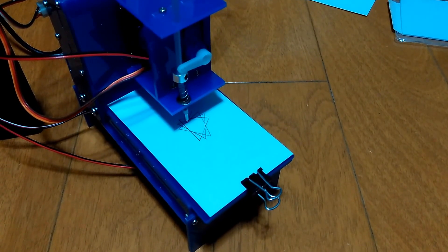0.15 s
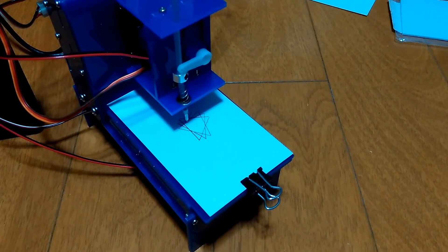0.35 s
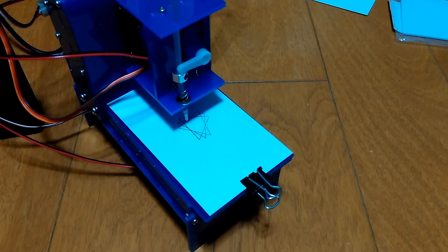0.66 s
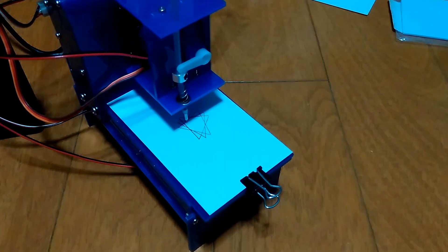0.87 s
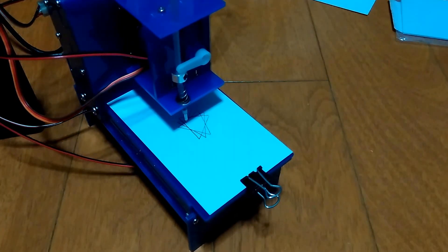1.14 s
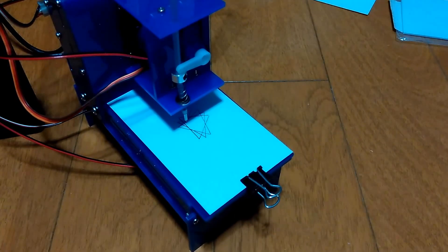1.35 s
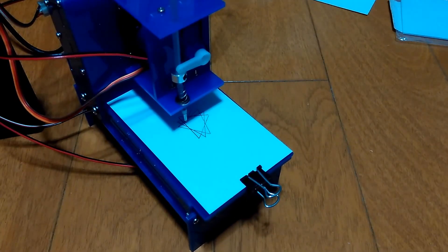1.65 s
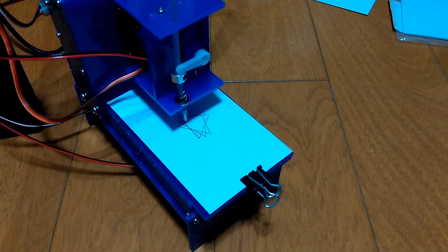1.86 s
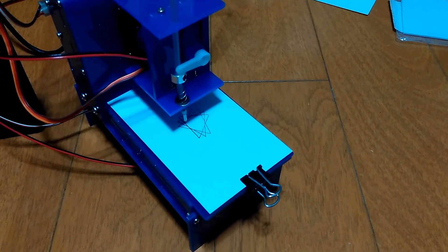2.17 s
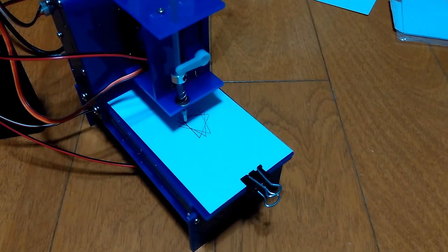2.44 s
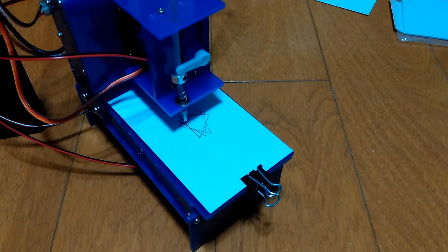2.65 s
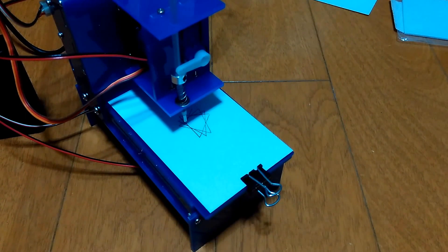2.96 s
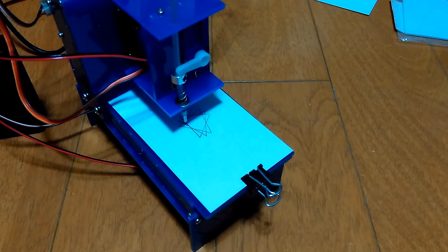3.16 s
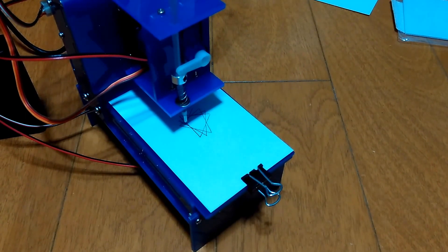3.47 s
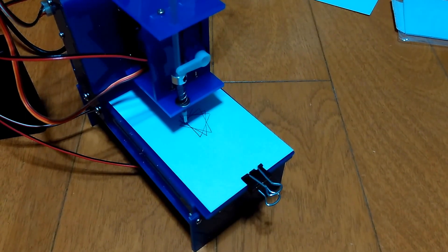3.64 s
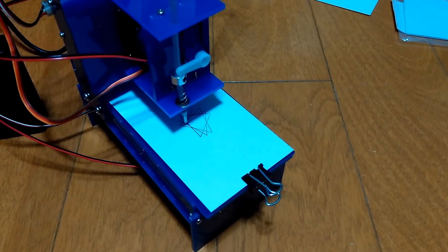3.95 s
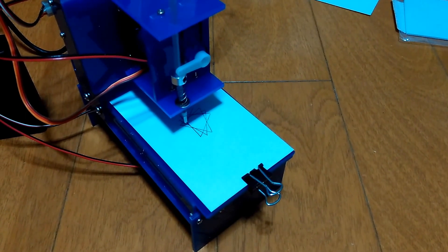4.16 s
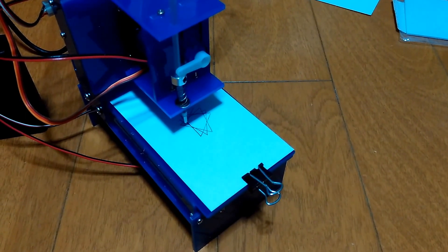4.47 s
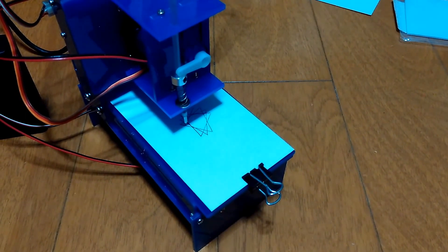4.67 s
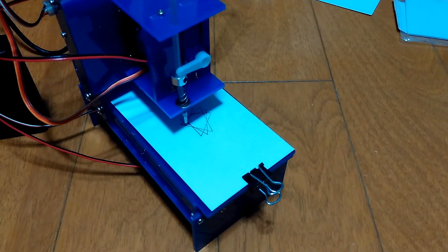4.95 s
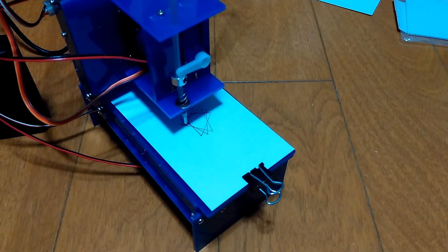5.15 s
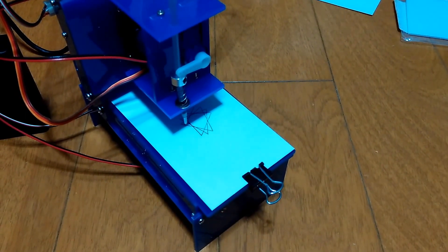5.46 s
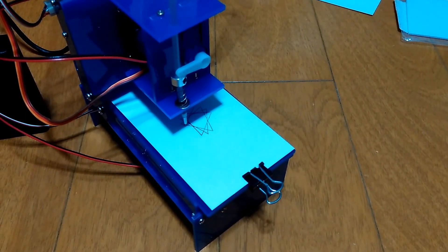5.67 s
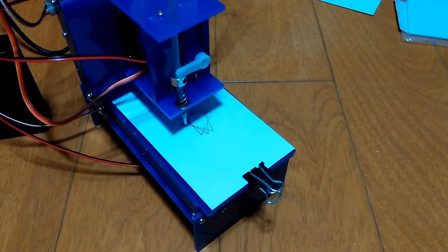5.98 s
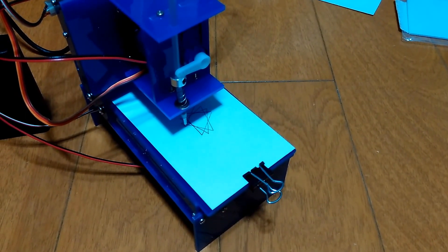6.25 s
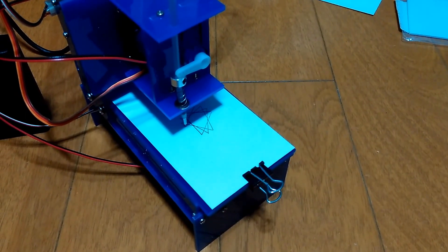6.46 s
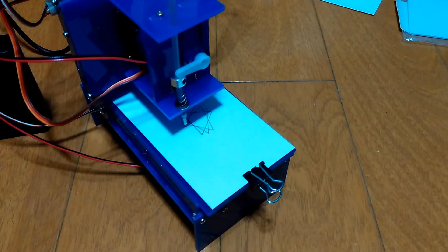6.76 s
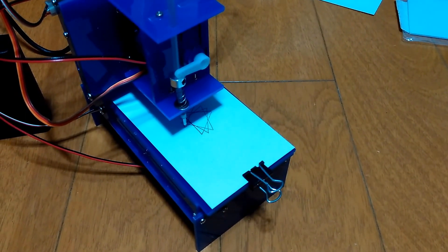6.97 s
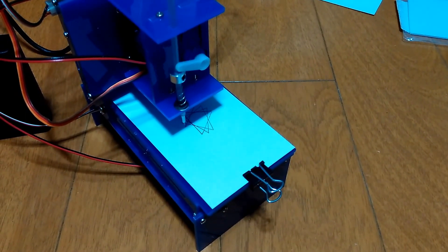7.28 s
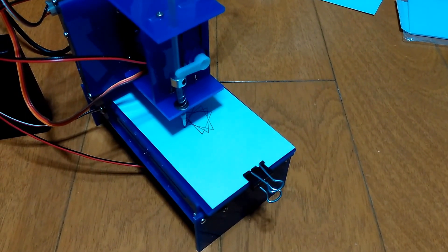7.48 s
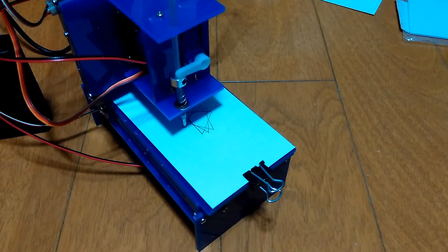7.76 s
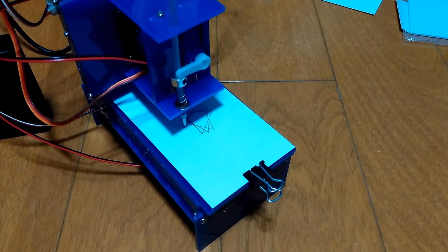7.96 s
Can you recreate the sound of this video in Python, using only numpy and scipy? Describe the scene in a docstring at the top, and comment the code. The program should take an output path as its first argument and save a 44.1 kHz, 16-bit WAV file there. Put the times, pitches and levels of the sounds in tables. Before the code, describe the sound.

A small plastic pen plotter buzzes with a fast, thin servo chatter, broken by irregular sharp clicks and rattles, then two short gear whirs near the end.

```python
"""A small plastic pen plotter works on a wooden floor, heard by a two-port microphone close by.
Its pen servo twitches fifty times a second and swings twice: enveloped noise and clicks excite resonances.
Slide jerks add bursts of rattle, the carriage scuffs, and blows on the floor ring its damped modes.
Coloured noise gives the room's rumble; two faint hums glide and waver far off, mainly at the left port.
The pressure at the right port jumps twice, each time as a pop."""
import sys
import numpy as np
from scipy import signal
from scipy.fft import rfft, irfft, next_fast_len
from scipy.io import wavfile

SR = 44100
rng = np.random.default_rng(int(sys.argv[2]) if len(sys.argv) > 2 else 0)


def transcribe(u):
    """Save the signal u as a 16-bit wav file named by the first command-line argument.

    u: samples, shape (n,) or (channels, n), limited to [-1, 1]; the rate is SR.
    q: integer samples, one column per channel.
    """
    v = np.clip(np.atleast_2d(u).T, -1, 1)
    q = np.round(v * 32767).astype(np.int16)
    wavfile.write(sys.argv[1], SR, q)


N = 358091
FFT_SIZE = next_fast_len(N, real=True)
LEFT_LAG, ROOM_LAG = 22, 7   # samples: left port later for the machine; right port earlier for the room

# Resonances of the servo case.
# Each row: frequency in Hz, width in Hz, relative level idling in dB, relative level under load in dB.
CASE_MODES = [(2736, 190, -9, -19), (3117, 160, -8.5, -8), (3424, 63, -8.5, -8), (3553, 81, -13, -10.5),
              (3840, 600, -7, -10), (4455, 400, -6.5, -23), (4720, 327, 0.5, 0), (5190, 155, -6, -0.5),
              (5790, 570, -12, -5), (6620, 120, -14, -9)]
# Each case resonance radiates from its own face.
# Each entry: delay of the left port in samples.
CASE_LAGS = [20, 21, 20, 24, 17, 22, 22, 22, 23, 22]
# Resonances of the gear train.
# Each row: frequency in Hz, width in Hz, relative level under load in dB, relative level when jolted in dB.
GEAR_MODES = [(7920, 170, -6, -10), (9260, 220, 4, -13), (9530, 260, -13, -12.5), (10060, 210, -1, -5),
              (10710, 250, -1, 3.5), (13060, 370, -5, -4), (14100, 240, -0.5, -15.5)]
GEARS_RIGHT_DB = -13   # gear ringing at the right port, relative to the left


def from_db(db):
    """Logarithmic level: decibels to amplitude gain."""
    return 10 ** (np.asarray(db) / 20)


def rms_one(x):
    """Power normalisation: scale to unit rms."""
    return x / np.sqrt(np.mean(x ** 2) + 1e-20)


def in_time(rows):
    """Linear interpolation: the columns of a curve table, one value a sample."""
    s, *columns = np.transpose(rows)
    return [np.interp(np.arange(N) / SR, s, c) for c in columns]


def over_hz(table):
    """Interpolation over log frequency: the columns of a spectrum table on the transform grid."""
    hz, *columns = np.transpose(table)
    grid = np.log(np.maximum(np.arange(FFT_SIZE // 2 + 1) * SR / FFT_SIZE, 1))
    return [np.interp(grid, np.log(hz), c) for c in columns]


def drift(rate_hz):
    """Low-passed noise: a slow random modulation of spread about 1, with two poles at the rate."""
    step = 40   # samples between values of the slow noise
    r = np.exp(-2 * np.pi * rate_hz * step / SR)
    noise = rng.standard_normal(N // step + 2002)
    slow = signal.lfilter([1], [1, -2 * r, r * r], noise)[2000:]   # the filter settles first
    return np.interp(np.arange(N) / step, np.arange(len(slow)), rms_one(slow))


def strikes(seconds, gains):
    """Impulse excitation: a train of single-sample clicks."""
    clicks = np.zeros(N)
    at = np.clip((np.asarray(seconds) * SR).astype(int), 0, N - 1)
    np.add.at(clicks, at, gains)
    return clicks


def swell(clicks, rise_s, fall_s):
    """Exponential build-up and decay: each click becomes a smooth envelope, lower the slower its rise."""
    a, b = np.exp(-1 / (rise_s * SR)), np.exp(-1 / (fall_s * SR))
    return signal.lfilter([1 - a], np.convolve([1, -a], [1, -b]), clicks + 1e-18)


def at_ports(x):
    """Arrival-time difference: the machine reaches the right port first."""
    return np.array([np.roll(x, LEFT_LAG), x])


def struck(modes, seconds, level_db, spread_db, tilt_db=0):
    """Modal synthesis: each blow excites every damped mode with a strength of its own."""
    out = np.zeros(N)
    luck = rng.standard_normal((len(seconds), len(modes)))
    for k, (hz, mode_db, t60) in enumerate(modes):
        r, w = from_db(-60 / (t60 * SR)), 2 * np.pi * hz / SR
        octaves = np.log2(hz / modes[0][0])
        blow_db = level_db + mode_db + tilt_db * octaves + spread_db * luck[:, k]
        # rise and fall times are fractions of the mode's period
        force = swell(strikes(seconds, from_db(blow_db)), 0.071 / hz, 0.23 / hz) / (.3 * SR / hz)
        out += signal.lfilter([0, np.sin(w)], [1, -2 * r * np.cos(w), r * r], force)
    return out


def body(resonances, envelope, flicker_db, flicker_hz, taps=0, lags=None, sway_s=0):
    """Forced resonance: noise under one envelope (or one each) and clean taps shake a plastic part."""
    sway_hz = 25   # how fast the resonances waver in pitch as the parts flex
    out = np.zeros((2, N))
    shake = np.atleast_2d(rng.standard_normal(N) * envelope + taps)
    for k, (hz, width_hz, level_db) in enumerate(resonances):
        r = np.exp(-np.pi * width_hz / SR)
        poles = [1, -2 * r * np.cos(2 * np.pi * hz / SR), r * r]
        sos = [[(1 - r * r) / 2, 0, (r * r - 1) / 2, *poles]] * 2
        share = from_db(level_db + flicker_db * np.clip(drift(flicker_hz), -3, 2))
        rung = signal.sosfilt(sos, shake[k % len(shake)] * share)
        rung *= (-1) ** k * np.sqrt(SR / width_hz)   # neighbours have opposite signs
        if sway_s:   # a varying delay bends the pitch
            rung = np.interp(np.arange(N) + sway_s * SR * drift(sway_hz), np.arange(N), rung)
        out += [np.roll(rung, lags[k] if lags else LEFT_LAG), rung]
    return out


def rattle(envelope, grain_db, grit_db):
    """Partly coherent noise: loose gear teeth give uneven grains in the colour of the case."""
    # Gear rattle at the ports.
    # Each row: frequency in Hz, relative left level in dB, relative right level in dB, likeness 0-1.
    rattle_colour = [(1230, -34, -38, 1), (2030, -25, -22, 0.9), (2560, -34, -39, 0.8),
                     (3120, -51, -23, 0.8), (3700, -39, -17, 0.7), (4300, -20, -11, .7),
                     (4730, -25, -9, 0.3), (6930, -10, -12, 0), (8760, 0, -4.5, 0),
                     (10940, 2.5, -12.5, 0.35), (11730, -5, -12, 0.3), (13400, -5.5, -34, 0.8),
                     (14200, -6.5, -19, 0.8)]
    grit = from_db(grit_db * np.minimum(rng.exponential(1, (2, N)), 3))
    own = rng.standard_normal((2, N)) * grit
    grain = from_db(grain_db * np.clip(drift(300), -3, 2))
    grains = np.array([np.roll(own[1], LEFT_LAG), own[0], own[1]]) * grain
    shared, apart, right = rfft(rms_one(grains) * envelope[[0, 0, 1]], FFT_SIZE)
    left_db, right_db, alike = over_hz(rattle_colour)
    alike = np.clip(alike, 0, 1)
    colour = from_db([left_db, right_db])
    colour /= np.sqrt(np.mean(colour[0] ** 2))
    left = alike * shared + np.sqrt(1 - alike ** 2) * apart
    return irfft([left, right] * colour, FFT_SIZE)[:, :N]


def swing_level():
    """Piecewise decibel envelope of the gears: run-up, sagging run, quick stop and after-rattle."""
    # Servo swings.
    # Each row: start in seconds, run-up in seconds, stop in seconds, gear level after the run-up in dB.
    swing_rows = [(7.270, 0.0076, 7.34, -31), (7.47, 0.017, 7.555, -26.5)]
    rise_db, sag_db_per_s = 22, 61
    stop_drop_db, stop_fall_s, after_db_per_s = 14, 0.026, 213
    t, out = np.arange(N) / SR, np.full(N, -120.)
    for start, rise_s, stop, level_db in swing_rows:
        top = start + rise_s
        end_db = level_db - sag_db_per_s * (stop - top)
        after, after_db = stop + stop_fall_s, end_db - stop_drop_db
        s = [start, top, stop, after, after + .5]
        db = [level_db - rise_db, level_db, end_db, after_db, after_db - .5 * after_db_per_s]
        out = np.maximum(out, np.interp(t, s, db, left=-120))
    return out


def servo_idle():
    """Periodic impulsive excitation: each control pulse kicks the motor, gears rattle, case knocks."""
    # The idling machine, before chance variation and the dip below.
    # Each row: time in seconds, nominal levels of twitch knock, twitch rattle and steady whirr in dB.
    idle_curve = [(0.0, -56, -47, -57), (0.7, -57, -46.5, -59), (1.45, -49, -44.5, -57.5),
                  (2.1, -50, -45.5, -58), (2.5, -52, -49.5, -64), (3.1, -51.5, -49.5, -64.5),
                  (3.75, -53, -47.5, -61), (4.3, -53, -49.5, -64), (5.0, -52.5, -49.5, -63),
                  (5.8, -52.5, -50, -62.5), (6.45, -50, -47.5, -60.5), (6.85, -50.5, -51, -62),
                  (7.25, -50.5, -53.5, -61.5), (7.62, -50, -47, -64), (8.12, -45.5, -45.5, -54.5)]
    twitch_hz, first_twitch_s = 50, .0105
    # twitches and whirr drop in level between the two swings
    dip_from_s, dip_until_s, dip_db, dip_fade_s = 7.40, 7.47, 30, 0.016
    loaded_knock_db = -10.5   # least knock level, relative to the swing's gear level
    hiss_db = -23   # steady shaking of the case between twitches, relative to the knock
    drop_db, = in_time([(dip_from_s, 0), (dip_from_s + dip_fade_s, -dip_db),
                        (dip_until_s, -dip_db), (dip_until_s + .01, 0)])
    knock_db, rattle_db, whirr_db = np.array(in_time(idle_curve)) + drop_db
    knock_db = np.maximum(knock_db, swing_level() + loaded_knock_db)

    count = int(N / SR * twitch_hz)
    luck = rng.standard_normal((count, 3))
    s = first_twitch_s + np.arange(count) / twitch_hz + 0.00028 * luck[:, 0]
    at = (s * SR).astype(int)
    taps = strikes(s - .0018, from_db(knock_db[at] + 1.7 * luck[:, 1]))
    knocks = swell(taps, 0.0012, 0.0007)
    whirr = from_db(whirr_db + 2.1 * drift(22.0))

    # a faint run-up, then the jolt
    kicks = strikes(s - .004, from_db(rattle_db[at] + 1.8 * luck[:, 1] + 0.81 * luck[:, 2]))
    run_up = from_db(-4.5) * swell(np.roll(kicks, -40), 0.002, 0.0071)
    jolt = from_db(2.0) * swell(np.roll(kicks, 150), 0.00068, 0.0026)
    gears = np.hypot(run_up, jolt)

    idling = [(hz, width_hz, idle_db) for hz, width_hz, idle_db, _ in CASE_MODES]
    shaking = np.hypot(knocks, from_db(knock_db + hiss_db + 3.6 * drift(14)))
    case = body(idling, shaking, flicker_db=2.2, flicker_hz=24.4,
                taps=from_db(10.0) * np.roll(taps, 100), lags=CASE_LAGS, sway_s=.0001)
    loose = np.hypot(at_ports(gears), at_ports(whirr) * from_db([[0], [-2.5]]))
    return case + rattle(loose, grain_db=2.5, grit_db=3.0)


def slide_jerks():
    """Impact and rattle: a clean hit rings gears and frame, loose parts decay; some have a lead-in."""
    # Slide jerks.
    # Each row: time in seconds, reference level in dB, frame knock and tail relative to it in dB.
    jerk_rows = [(0.185, -37.5, -26.5, -27), (0.2495, -38, -27, -16), (0.9592, -42, -41, -8),
                 (1.01, -39, -41, -16), (1.3293, -35.5, -26, -10.5), (1.41, -52, -34, -22),
                 (1.437, -35, -30, -8.5), (1.7122, -33, -20, -18), (1.844, -37.5, -22.5, -23),
                 (2.0972, -32.5, -17, -9), (2.582, -43, -19, -2.5), (2.6927, -35, -33, -11),
                 (2.806, -34, -17, -6), (2.9114, -38, -25, -11), (2.9155, -24, -20.5, -14.5),
                 (3.237, -42, -22, -4), (3.299, -41.5, -27, -2.5), (3.5571, -30.5, -30, -14),
                 (3.9461, -29, -19.5, -8.5), (4.1574, -35.5, -28, -6), (4.4284, -33.5, -27, -10),
                 (4.4404, -48, -34, -16), (4.5421, -29.5, -18, -10), (5.2496, -35.5, -45, -21),
                 (5.2697, -37, -31, -17), (5.415, -41, -16.5, -1.5), (5.63, -51, -18, 0),
                 (5.915, -43, -27, -11), (6.285, -44.5, -38, 0.5), (6.4979, -29, -36, -13),
                 (6.512, -34, -26, -15), (6.8818, -26, -21, -11), (7.671, -41, -47, -24),
                 (7.753, -38, -49, -22), (7.852, -44, -32, -11), (7.863, -45, -40, -4),
                 (7.8656, -38, -19, -4), (7.878, -37, -28, -11.5), (7.911, -48, -28, -22),
                 (7.951, -40, -23, -14), (8.008, -40, -24, -16)]
    # Slack that rattles out just before some jerks.
    # Each row: time in seconds, nominal level in dB.
    slack_rows = [(0.181, -44.5), (0.2445, -43), (1.3265, -46), (1.7098, -40.5), (2.801, -37), (3.943, -36),
                  (4.539, -37.5)]
    # Resonances of the frame.
    # Each row: frequency in Hz, width in Hz, relative level in dB.
    frame_modes = [(1155, 670, -1), (1474, 170, -4.5), (1750, 310, -10.5), (2620, 570, -9.5),
                   (3250, 170, -9.5)]
    burst_db, ring_db = -6.5, 7.5   # loose rattle and gear ringing hit, beside the reference level
    pan_db = 3   # rattle, left minus right
    s, peak_db, knock_db, tail_db = np.transpose(jerk_rows)
    lead_s, lead_db = np.transpose(slack_rows)
    lead = swell(strikes(lead_s, from_db(lead_db)), 0.00037, 0.0037)
    burst = swell(strikes(s, from_db(peak_db + burst_db)), 0.00031, 0.0025)
    tail = swell(strikes(s, from_db(peak_db + tail_db - 2.5)), 0.0022, 0.02)

    blows = strikes(s, from_db(peak_db + knock_db))
    shaking = 0.23 * swell(blows, 0.00083, 0.0043) + 0.17 * swell(blows, 0.0015, 0.022)
    knock = body(frame_modes, shaking, flicker_db=3.0, flicker_hz=21.0, taps=from_db(15.5) * blows)
    jolted = [(hz, width_hz, jolt_db) for hz, width_hz, _, jolt_db in GEAR_MODES]
    hits = strikes(s, from_db(peak_db + ring_db))
    ring = body(jolted, 0, flicker_db=2.0, flicker_hz=30.0, taps=hits)

    sides = from_db([[pan_db / 2], [-pan_db / 2]])
    envelope = np.sqrt(lead ** 2 + burst ** 2 + tail ** 2)
    shaken = rattle(envelope * sides, grain_db=3.5, grit_db=0.5)
    return shaken + knock * from_db([[4], [-4]]) + ring * from_db([[0], [GEARS_RIGHT_DB]])


def servo_swings():
    """Random tooth impacts under load: dense rattle and hard catches ring the case and the gears."""
    # Teeth catching hard during and around the swings.
    # Each row: time in seconds, nominal level in dB.
    catch_rows = [(7.2717, -27), (7.279, -14.5), (7.2844, -17), (7.2944, -24), (7.3044, -24), (7.3114, -26),
                  (7.3297, -21.5), (7.344, -27), (7.389, -43), (7.4795, -22), (7.4907, -16), (7.496, -17),
                  (7.503, -17), (7.5103, -15.5), (7.5154, -11.5), (7.5204, -15), (7.5257, -18),
                  (7.5325, -20), (7.5424, -22), (7.554, -23), (7.5674, -38)]
    teeth_per_s, teeth_db, teeth_spread_db = 410, 3, -1   # mean rate and strength of tooth contacts
    s, catch_db = np.transpose(catch_rows)
    catches = swell(strikes(s - .0007, from_db(catch_db)), 0.00069, 0.0014)
    envelope = np.hypot(from_db(swing_level()), catches)
    contacts = rng.random(N) < teeth_per_s / SR
    teeth = contacts * from_db(teeth_db + teeth_spread_db * rng.standard_normal(N))

    sway_s = .00004   # spread of the wavering, as delay
    loaded = [(hz, width_hz, load_db) for hz, width_hz, _, load_db in CASE_MODES]
    case = body(loaded, from_db(-23) * envelope, flicker_db=4.0, flicker_hz=39.7,
                taps=teeth * envelope, lags=CASE_LAGS, sway_s=sway_s)
    meshing = [(hz, width_hz, load_db) for hz, width_hz, load_db, _ in GEAR_MODES]
    hits = from_db(-4.5) * teeth * envelope + strikes(s, from_db(catch_db + 2.5))
    gears = body(meshing, from_db(-41) * envelope, flicker_db=2.5, flicker_hz=29.7,
                 taps=hits, sway_s=sway_s)
    loose = rattle(at_ports(envelope) * from_db([[0.1], [-0.4]]), grain_db=2.1, grit_db=3.5)
    return loose + case + gears * from_db([[0], [GEARS_RIGHT_DB]])


def scuffs():
    """Friction noise: something on the carriage rubs for a few milliseconds and excites resonances."""
    # Short dry scuffs.
    # Each row: time in seconds, nominal excitation of the low, middle and high resonance in dB.
    scuff_rows = [(2.589, -56, -53, -66), (2.803, -59, -70, -72), (3.298, -72, -61, -51),
                  (5.039, -72, -72, -46), (5.416, -59, -56, -56), (5.639, -54, -68, -51),
                  (5.91, -53, -68, -46.5), (6.51, -66, -64, -45), (7.871, -53, -53.5, -50)]
    # Resonances of the rubbing part.
    # Each row: frequency in Hz, width in Hz, relative level in dB.
    scuff_modes = [(1440, 160, 0), (2110, 1350, 0), (2870, 520, 0)]
    rise_s, fall_s = 0.0055, 0.0056
    s, *levels_db = np.transpose(scuff_rows)
    rub = np.array([swell(strikes(s, from_db(db)), rise_s, fall_s) for db in levels_db])
    return body(scuff_modes, rub, flicker_db=-1.0, flicker_hz=27) * from_db([[1.5], [-1.5]])


def floor_thumps():
    """Modal excitation: soft blows ring the boards, sharper ones the higher modes."""
    # Thumps in the floor.
    # Each row: time in seconds, nominal level in dB, sharpness in dB per octave.
    thump_rows = [(0.201, -53.5, 0.5), (1.134, -55, -4), (1.451, -55, -1), (2.443, -55, -8),
                  (3.963, -48.5, -0.5), (4.56, -48, 1.5), (4.936, -44.5, -9), (5.105, -57, 2),
                  (5.198, -59, 5), (5.915, -53, 7), (6.299, -55, 4.5), (6.523, -49.5, 2),
                  (6.894, -46, -1.5), (7.13, -53, -2), (7.291, -43, 2), (7.885, -53, 5)]
    # Modes of the floor boards.
    # Each row: frequency in Hz, relative level in dB, decay time by 60 dB in seconds.
    board_modes = [(73.4, 14, 0.27), (144.5, 8, 0.13), (221, 12, 0.059), (322, 4, 0.043)]
    s, level_db, sharp_db = np.transpose(thump_rows)
    thumps = struck(board_modes, s, level_db, spread_db=3.0, tilt_db=sharp_db)
    return thumps * [[1], [-.65]]   # the ports face opposite ways


def pops():
    """Step and cavity resonance: the pressure at the right port jumps and its cavity rings briefly."""
    # Pressure steps at the right port.
    # Each row: time in seconds, step level in dB.
    pop_rows = [(2.0381, -10), (2.9280, -7.5)]
    # Resonance of the port cavity.
    # Each row: frequency in Hz, relative level in dB, decay time by 60 dB in seconds.
    cavity_modes = [(4010, -21.5, 0.014)]
    s, step_db = np.transpose(pop_rows)
    jumps = np.cumsum(strikes(s, from_db(step_db)))
    step = signal.lfilter([.3], [1, -.7], jumps)   # rounds the edge
    ring = struck(cavity_modes, s + 0.00062, step_db, spread_db=4)
    return np.array([np.zeros(N), step + ring])


def far_hums():
    """Narrow-band modulation: gliding tones whose strength and phase are shaken by slow chance."""
    # Two rough hums that waver far off, one list for each.
    # Each row: time in seconds, pitch in Hz, level in dB.
    hum_curves = [
        [(4.9, 561, -87), (5.08, 530, -74), (5.2, 560, -72), (5.36, 585, -68), (5.44, 657, -66.5),
         (5.65, 649, -71), (5.76, 552, -65), (5.95, 558, -91), (6.12, 570, -64.5), (6.22, 600, -65.5),
         (6.36, 679, -71), (6.48, 618, -71), (6.6, 693, -71), (6.8, 651, -97), (7.03, 680, -66),
         (7.1, 615, -84), (7.19, 570, -66)],
        [(4.9, 950, -85), (5.1, 915, -68), (5.2, 966, -90), (5.3, 970, -78), (5.5, 900, -95), (5.68, 875, -71),
         (5.82, 994, -68), (5.97, 1020, -75), (6.1, 988, -96), (6.28, 976, -69), (6.53, 918, -75),
         (6.75, 925, -68), (6.9, 890, -86)],
    ]
    rough_hz, fade_s, right_db = 20, 0.27, -25
    out, t = np.zeros(N), np.arange(N) / SR
    for rows in hum_curves:
        hz, level_db = in_time(rows)
        phase = 2 * np.pi * np.cumsum(hz) / SR
        first, last = rows[0][0], rows[-1][0]
        fade = np.interp(t, [first - fade_s, first, last, last + fade_s], [0, 1, 1, 0])
        tone = drift(rough_hz) * np.sin(phase) + drift(rough_hz) * np.cos(phase)
        out += fade * from_db(level_db) * tone
    return np.array([out, -from_db(right_db) * np.roll(out, -ROOM_LAG)])


def room():
    """Partly coherent noise: lumpy rumble, murmur and air; ports facing opposite ways invert the shared part."""
    # Colour of the room sound.
    # Each row: frequency in Hz, relative left level in dB, relative right level in dB, likeness 0-1.
    room_colour = [(29.2, -10.5, -2.5, 0.72), (65.4, 3, -3.5, 0.96), (138, -5, -8.5, 0.93),
                   (312, -14.5, -18, 0.87), (453, -20.5, -24.5, 0.53), (630, -13, -19.5, 0.81),
                   (882, -19.5, -26, 0.94), (887, -13, -18, 1), (1354, -23, -27, 0.67),
                   (2450, -26.5, -31.5, 0), (3370, -29, -31.5, 0), (3900, -22, -29, 0),
                   (5140, -26, -42, 0.52), (13600, -58, -28.5, 0)]
    # Course of the room sound, each curve used relative to its own mean.
    # Each row: time in seconds, rumble level in dB, murmur level in dB.
    room_curve = [(0.0, -76.5, -76.5), (0.5, -74.5, -77), (1.76, -72, -70.5), (2.15, -69, -72),
                  (2.53, -71.5, -73.5), (2.96, -72, -71), (3.69, -75.5, -75), (6.24, -71.5, -71),
                  (7.44, -73, -73), (8.12, -73, -73)]
    left_db, right_db, alike = over_hz(room_colour)
    alike = np.clip(alike, 0, 1)
    shared, own = rfft(rng.standard_normal((2, FFT_SIZE)))
    early = rfft(np.roll(irfft(shared, FFT_SIZE), -ROOM_LAG))
    other = -alike * early + np.sqrt(1 - alike ** 2) * own
    spectra = [shared * from_db(left_db), other * from_db(right_db)]
    noise = rms_one(irfft(spectra, FFT_SIZE)[:, :N])

    low = signal.sosfiltfilt(signal.butter(2, 300, fs=SR, output="sos"), noise)
    middle = signal.sosfiltfilt(signal.butter(2, 1500, fs=SR, output="sos"), noise - low)
    air = noise - low - middle
    rumble_db, murmur_db = in_time(room_curve)
    rumble = low * from_db(rumble_db - rumble_db.mean() + 4.0 * drift(7.4))
    # two bands of the murmur swell apart
    deep = signal.sosfiltfilt(signal.butter(4, 790, fs=SR, output="sos"), middle)
    bands = [part * from_db(2.46 * drift(3.1) + 2.3 * drift(25.0)) for part in (deep, middle - deep)]
    murmur = sum(bands) * from_db(murmur_db - murmur_db.mean())
    return from_db(-58) * (air + rumble + murmur)


def scene():
    """Superposition: all sources add at the two ports."""
    machine = servo_idle() + slide_jerks() + scuffs() + floor_thumps() + servo_swings()
    return machine + room() + far_hums() + pops()


def record(dry):
    """Band limiting: a steep low cut turns pressure steps into a dying wobble; the top is cut."""
    low_cut_hz, stop_hz = 51, 14700   # from stop_hz upwards at least 45 dB are removed
    x = signal.sosfilt(signal.butter(5, low_cut_hz, "high", fs=SR, output="sos"), dry)
    return signal.sosfilt(signal.cheby2(14, 45, stop_hz, fs=SR, output="sos"), x)


dry = scene()
out = record(dry)
transcribe(out)
```